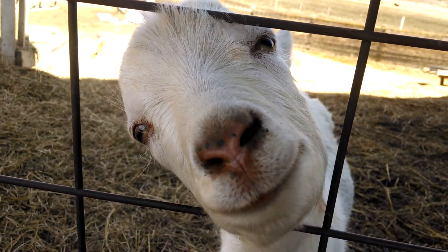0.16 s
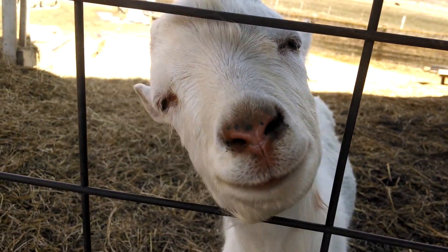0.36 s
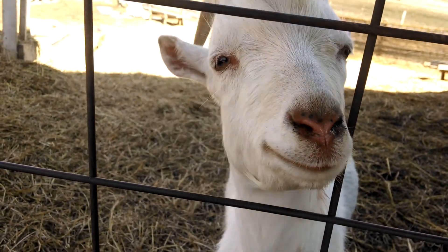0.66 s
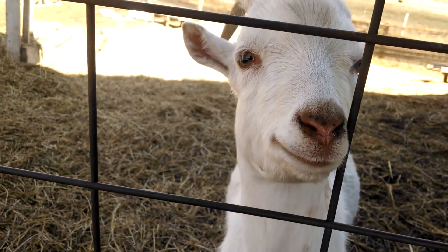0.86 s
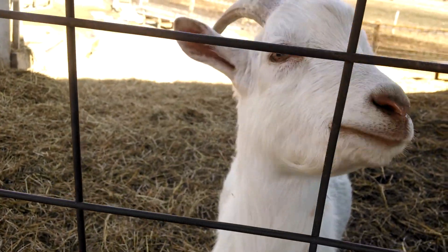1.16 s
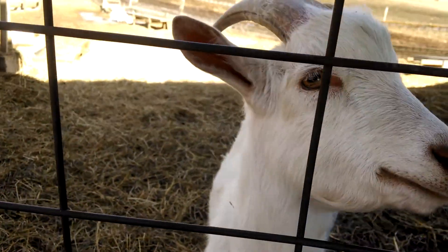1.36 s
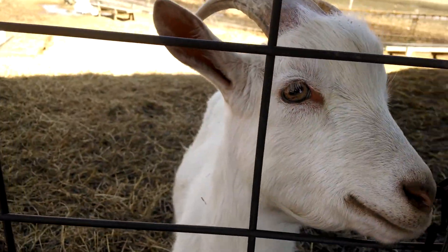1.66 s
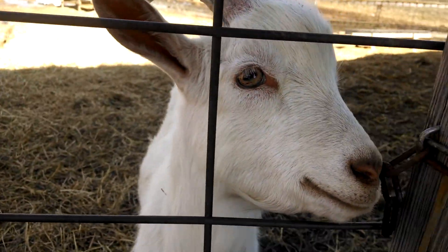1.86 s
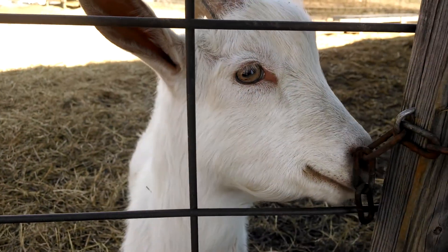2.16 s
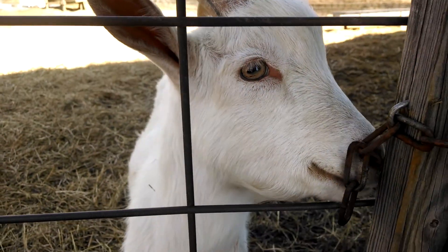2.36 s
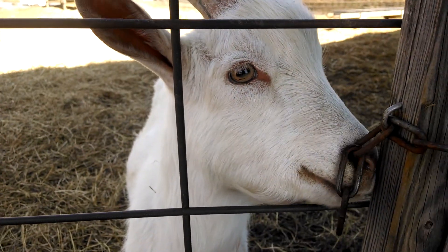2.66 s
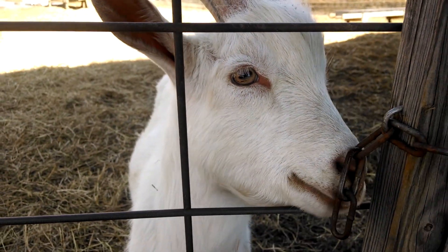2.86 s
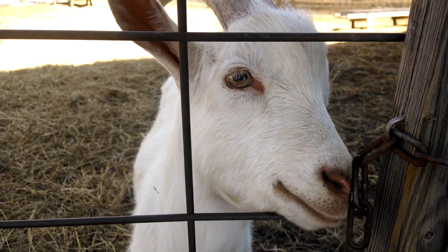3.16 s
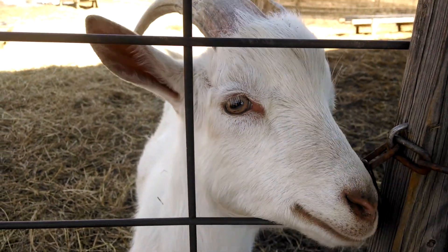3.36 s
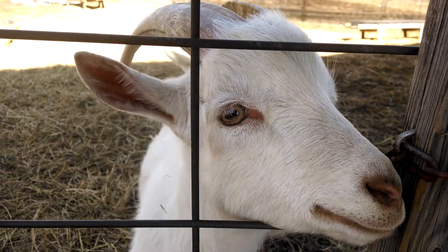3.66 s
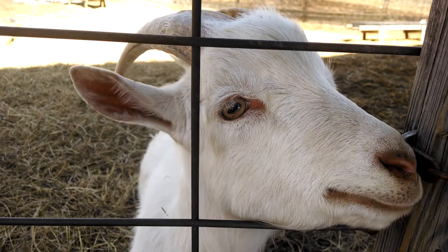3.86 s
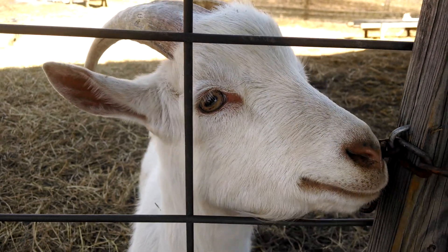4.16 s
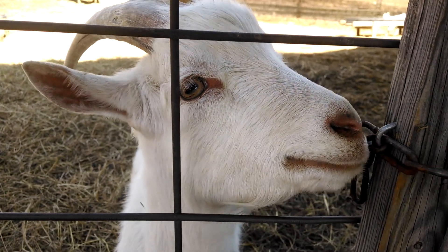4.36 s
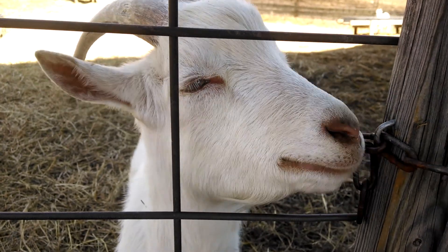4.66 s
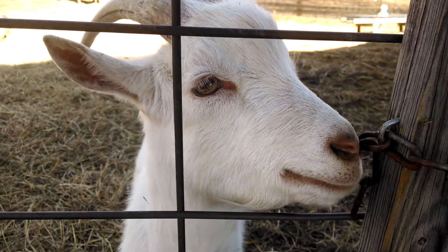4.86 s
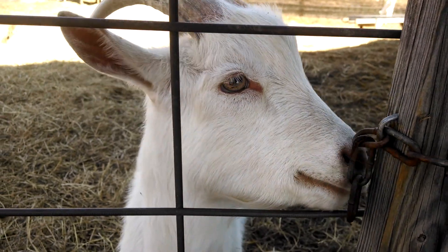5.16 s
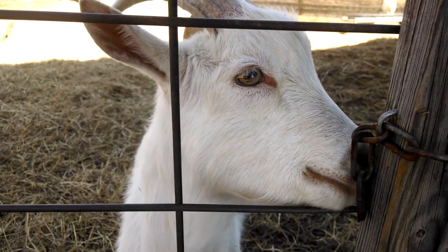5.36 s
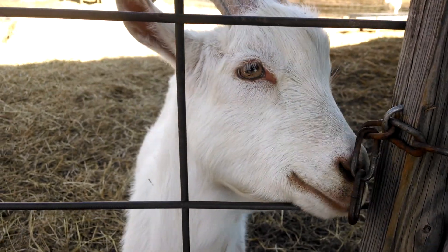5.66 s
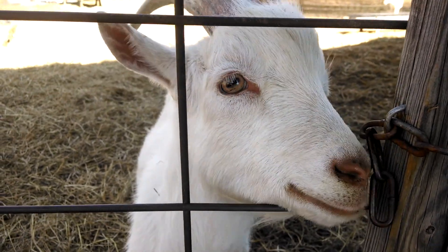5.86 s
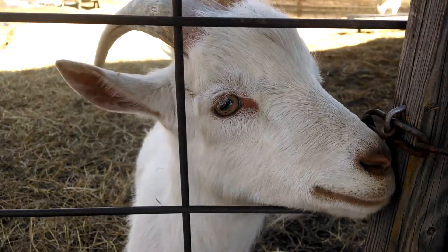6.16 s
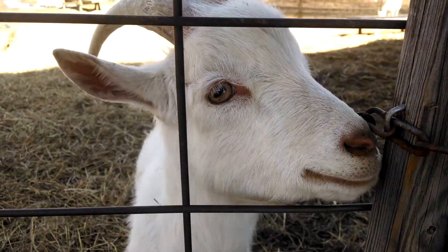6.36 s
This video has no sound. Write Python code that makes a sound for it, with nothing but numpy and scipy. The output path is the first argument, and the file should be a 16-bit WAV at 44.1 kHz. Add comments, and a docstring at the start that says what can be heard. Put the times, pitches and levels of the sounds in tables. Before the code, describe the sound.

Outdoors in a paddock, gusts of wind thump and rumble on a close microphone, hardest on the left. About a second in, a young goat nearby gives one throbbing bleat. It then noses a metal chain on a wooden gate post: the links clink, scrape softly and knock on the wood in uneven clusters, with faint sniffs and a thin nose whistle. The gusts thin out, and the links ring brighter near the end.

```python
"""Wind thumps on a microphone, hardest on the left, as a goat noses a chain on a gate post.
Links clink and scrape, the wooden post knocks, and the goat sniffs with a thin whistle.
About a second in, a young goat nearby gives one throbbing bleat: its vocal folds buzz
and its throat, nose and mouth shape the tone. The microphone has two openings, called ports,
and widens the sound by subtracting a delayed copy of each from the other."""
import sys
import numpy as np
from scipy import signal
from scipy.fft import rfft, irfft
from scipy.io import wavfile
from scipy.ndimage import uniform_filter1d

SR = 44100
rng = np.random.default_rng(int(sys.argv[2]) if len(sys.argv) > 2 else 0)


def master_out(mix):
    """Clip the mix to full scale and print it as 16-bit PCM to the path in sys.argv[1]."""
    frames = np.transpose(np.atleast_2d(mix))
    ceiling = np.clip(frames, -1, 1)
    pcm = np.round(ceiling * 32767).astype(np.int16)
    wavfile.write(sys.argv[1], SR, pcm)


N = 286650

# Tone colours. Each row: frequency in Hz, relative level in dB.
PADDOCK_COLOUR = [(100, -23), (300, 1), (700, -13), (1500, -28.5), (3000, -33), (7000, -27), (16000, -27)]   # far hum and hiss
SCRAPE_COLOUR = [(200, 9.5), (500, 5.5), (1200, 0.5), (2000, -2), (3800, -9.5), (7000, -22), (12000, -79)]   # chain on wood; also used for scattered sound
SNIFF_COLOUR = [(1000, 6), (2500, -10), (5000, -2.5), (8000, -1.5), (12000, -4.5), (16000, -6)]   # air in the nose
CRACK_COLOUR = [(500, -56), (1500, 8), (2600, 8.5), (4000, 4), (6600, 1.5), (9500, -4), (12000, -11),
                (16000, -17)]   # link hitting link
THROAT_COLOUR = [(400, -30), (620, -24.5), (720, -11), (780, -8.5), (850, -1.5), (920, -8.5), (1100, -29.5),
                 (1400, -37), (1800, -21.5), (2250, -20.5), (2500, -22), (2800, 8), (3250, -4), (3450, 3),
                 (3650, -2.5), (3900, -21), (4150, -16), (4600, -11), (6500, -6.5), (8200, -29),
                 (11000, -28)]   # how the throat shapes the voice
BREATH_COLOUR = [(600, -45), (900, -20), (1400, -12), (2200, -22), (3300, 4), (4100, -15.5), (6500, -13),
                 (8200, -14.5), (10500, -33), (12500, -51)]   # air in the throat

# Steady wind. Each row: time in seconds, left level in dB, sheltered right level in dB.
STEADY_WIND = [(0.0, -19, -41), (.26, -26.5, -28), (.45, -18, -52), (.6, -25, -32), (.8, -13, -20),
               (1.05, -50, -22), (1.25, -39, -38), (1.42, -20, -38), (1.75, -19.5, -26), (2.1, -55, -26),
               (2.4, -32.5, -42), (2.9, -28.5, -23.5), (3.2, -20.5, -28.5), (3.42, -37.5, -23),
               (3.9, -37.5, -29), (4.35, -36.5, -29.5), (4.57, -28.5, -26), (4.72, -65, -36.5),
               (5.02, -53.5, -65), (5.4, -39, -65), (5.95, -39, -36.5), (6.5, -36.5, -36.5)]
# Gusts, a left list then a right list. Each row: time in seconds, peak in dB, flutter in dB from peak.
PORT_GUSTS = [
    [(.09, -4, -11.5), (.32, -12, -14.5), (.494, -5.5, -22.5), (.619, -11.5, -18), (.843, -10, -4.5),
     (.925, -10.5, -13.5), (.99, -10, -12.5), (1.107, -8.5, -11.5), (1.152, -16.5, -12.5),
     (1.317, -13, -23), (1.502, -7.5, -15), (1.581, -10, -12), (1.891, -12.5, -13), (1.941, -36, -17),
     (2.015, -15.5, -22), (2.17, -13.5, -15), (2.24, -11, -2), (2.28, -6, -25), (2.365, -20, -7),
     (2.494, -11, -0.5), (2.594, -19.5, -28), (2.674, -14.5, -9.5), (2.724, -19, -30), (2.809, -9.5, -19.5),
     (3.003, -25.5, -8.5), (3.118, -15, -11), (3.582, -20.5, -20), (3.722, -26, -20), (4.001, -22, -33),
     (4.435, -19.5, -40), (5.293, -22.5, -22), (5.547, -36, -32), (6.016, -29, -2), (6.326, -14.5, -19)],
    [(.04, -20.5, -4), (.903, -33, -24), (1.731, -31, -1), (2.479, -8, -10.5), (3.14, -24, -7),
     (4.23, -10.5, -22), (4.615, -23, -4), (6.146, -23.5, -15)],
]
# Wind pops on the left port. Each row: time in seconds, level in dB, frequency in Hz.
WIND_POPS = [(0.087, -18, 150), (0.099, -9.5, 198), (0.317, -10, 171), (.396, -18, 200), (0.486, -17, 198),
             (0.497, -15, 170), (0.627, -21, 170), (.753, -6.5, 152), (0.788, -20.5, 171),
             (0.812, -7.5, 151), (0.834, -7.5, 208), (.884, -24, 200), (0.927, -20, 223.5),
             (.981, -10, 170), (1.103, -23, 133), (1.111, -36, 175), (1.148, -20.5, 202), (2.204, -5, 200),
             (2.228, -10, 303), (2.242, -11, 320), (2.261, -13, 330)]

# Nosing about. Each row: start in seconds, length in seconds, level in dB.
CHAIN_DRAGS = [(0.0, 0.24, -54.5), (0.5, 0.34, -58.5), (1.976, 0.029, -39), (2.628, 0.61, -54.5),
               (3.36, 0.17, -42.5), (3.836, 0.1, -42), (4.183, 0.077, -44.5), (4.439, 0.23, -47),
               (4.767, 0.23, -54), (5.999, 0.25, -50.5), (6.467, .1, -41)]
GOAT_SNIFFS = [(0.0, 0.77, -62), (2.93, 0.3, -51.5), (3.693, 0.19, -51.5), (4.228, 0.18, -47),
               (4.52, 0.13, -54), (5.589, 0.36, -60), (5.978, 0.3, -59.5), (6.443, .1, -48.5)]
# Nostril whistles, one list each. Each row: time in seconds, pitch in Hz, level in dB.
NOSE_WHISTLES = [
    [(2.81, 9100, -54), (2.85, 11300, -64), (3.02, 13500, -66), (3.12, 14500, -51), (3.2, 14200, -53),
     (3.36, 9200, -58)],
    [(3.7, 5200, -77), (3.726, 5791, -52), (3.82, 5318, -53)],
]

# The tones struck things ring with. Each row: frequency in Hz, level in dB, seconds to fade by 60 dB.
POST_TONES = [(810, -14, .05), (1040, -4, .04), (1300, -8, .03), (1680, -2, .05), (1900, -6, .025),
              (2400, -14, .012), (3900, -14, .015)]
GATE_TONES = [(307, 0, .14), (528, -1, .2), (610, -4, .2), (721, -1, .2), (815, -2, .18), (1010, -2, .14),
              (1200, -1, .2), (1500, -4, .16), (1640, -4, .14), (1830, -8, .14), (2060, -9, .12),
              (3300, -15, .06), (4200, -15, .05)]
FENCE_TONES = [(2014, 1.5, 0.068), (3120, 12.5, 0.029), (3550, -2, 0.059), (3860, -10, 0.25),
               (5040, -5, .08), (5700, -8, 0.12), (7500, -20, 0.082)]
WIRE_TONES = [(4400, 3.5, 0.026), (4480, -25, 0.017)]
NEAR_LINK_TONES = [(11320, -6, .1), (11420, -2, .15), (11560, -16, .05), (10760, -20, .05),
                   (3400, -24, .12), (6750, -16, .04)]
FAR_LINK_TONES = [(12120, -15, .16), (12160, -15, .3), (12540, -14, .05), (12800, -14, .05),
                  (13190, -14, .2)]
# Chain hits. Each row: time in seconds, crack in dB, crack centre in Hz, knock in dB, link ring in dB.
CHAIN_HITS = [(0.148, -30, 3630, -35, -61), (1.9748, -24, 7000, -34, -43), (2.363, -66, 4180, -63, -91),
              (2.4057, -44, 1625, -43, -87), (2.7204, -50, 1530, -49, -74), (2.901, -64, 1520, -41, -71),
              (3.3433, -40, 1800, -61, -63), (3.368, -42.5, 4100, -38, -73), (3.3771, -44, 1630, -35, -60),
              (3.4416, -27, 2580, -43, -54), (3.469, -23, 4150, -39, -35), (3.487, -25, 4070, -38.5, -58),
              (3.684, -42.5, 4030, -35.5, -69), (3.7924, -35.5, 1650, -38, -56),
              (3.8105, -30.5, 1720, -30.5, -71), (3.8432, -26, 1530, -40, -52),
              (3.884, -24.5, 4230, -31, -54), (3.9426, -19, 4170, -90, -62),
              (4.0522, -34, 1860, -33.5, -77), (4.1349, -38, 1650, -40.5, -73),
              (4.2069, -23.5, 4070, -29, -61), (4.5275, -30, 1800, -39, -59),
              (4.601, -33.5, 3350, -37.5, -70), (4.622, -30, 3400, -39, -68),
              (4.6306, -15, 8500, -63, -30.5), (4.781, -32, 1580, -31.5, -58), (4.789, -58, 1630, -39, -72),
              (4.8144, -13, 3870, -38, -41), (4.9301, -45, 1610, -41, -98), (4.9578, -41.5, 1800, -51, -64),
              (5.0659, -52, 1610, -45.5, -73), (5.1903, -46.5, 1640, -53, -76),
              (5.214, -44, 1650, -51, -59), (5.2643, -32, 1830, -51, -69), (5.9803, -27.5, 1650, -76, -53),
              (6, -30.5, 1660, -49, -64), (6.0286, -27.5, 4020, -32.5, -46),
              (6.0378, -30.5, 1630, -33.5, -36), (6.1677, -18.5, 5400, -40.5, -16),
              (6.2002, -39, 3850, -56, -37), (6.335, -23, 2150, -24.5, -63), (6.36, -64, 1710, -68, -39),
              (6.4051, -25, 4270, -89, -21), (6.455, -29, 1680, -34.5, -32)]
# Small ticks on a wire. Each row: time in seconds, level in dB.
WIRE_TICKS = [(1.6488, -26), (1.8034, -26.5), (1.8734, -32)]
# Jingles as the goat leans on the chain. Each row: time in seconds, near link in dB, far link in dB.
LINK_JINGLES = [(1.62, -60, -68), (1.66, -60, -62), (1.72, -58, -58), (1.77, -62, -66), (1.98, -66, -43),
                (2.06, -70, -50), (2.13, -70, -53)]

# The bleat's throbs. Each row: start in seconds, length in seconds, top pitch in Hz,
# closing fall as a share of that pitch, level in dB, brightness in dB.
BLEAT_THROBS = [(1.194, 0.062, 452, 0.21, -67.5, 4.5), (1.31, 0.05, 442.8, .3, -40, 5.5),
                (1.403, 0.061, 447.6, 0.11, -25, -4), (1.505, 0.062, 450.2, 0.14, -23, -4.5),
                (1.606, 0.067, 462.5, .2, -25, -4), (1.706, 0.067, 465.4, .2, -22, -5),
                (1.81, 0.063, 463.4, .2, -23.5, -4.5), (1.912, .07, 459.8, .2, -23, -6),
                (2.012, 0.072, 464.7, 0.22, -22, -6.5), (2.113, 0.071, 459, 0.2, -22, -6.5),
                (2.208, 0.067, 361, -.03, -27, -17)]
# The shape of one throb. Each row: share of its length, share of the opening rise still to come,
# share of the closing fall, added level in dB, added brightness in dB.
THROB_SHAPE = [(-.08, 1.0, 0.011, -41, 10), (.03, .85, 0.0049, -8, -3), (.17, .47, 0.015, -8.5, 1.5),
               (.31, .22, 0.02, -2.5, -1), (.47, 0.012, 0.012, 0, -4.5), (0.649, 0.0018, 0, 1, -2.5),
               (.8, 0, .33, -5.5, 1.5), (.93, 0.041, .55, -15.5, 8), (1.099, 0.11, 0.93, -52, 5),
               (1.299, 0.0059, 0.96, -43, -1)]
# Nose and mouth ring at fixed pitches. Each row: frequency in Hz, seconds to fade by 60 dB, level in dB.
HEAD_CAVITIES = [(850, .09, -9), (1650, .03, -2), (3220, .04, -3), (3660, .05, 0)]


def from_db(db):
    """Turn decibels into a number to multiply by."""
    return 10 ** (np.asarray(db) / 20)


def rms_one(x):
    """Scale a signal so its average strength (rms) is 1."""
    return x / np.sqrt(np.mean(x ** 2) + 1e-20)


def in_time(rows):
    """Join timed rows with straight lines, giving one curve for each column after the time."""
    times, *columns = np.transpose(rows)
    return [np.interp(np.arange(N) / SR, times, column) for column in columns]


def at_hz(colour, hz):
    """Look up a tone colour's level in dB at a frequency."""
    frequencies, levels = np.transpose(colour)
    return np.interp(np.log(hz), np.log(frequencies), levels)


def noise(colour, channels=1):
    """Noise with the given tone colour and strength 1."""
    gain = from_db(at_hz(colour, np.maximum(np.arange(N // 2 + 1) * SR / N, 1)))
    return rms_one(irfft(rfft(rng.standard_normal((channels, N))) * gain, N))


def drift(rate_hz):
    """A smooth random wobble of strength 1."""
    smooth = signal.butter(2, rate_hz, fs=SR, output="sos")
    return rms_one(signal.sosfilt(smooth, rng.standard_normal(N + SR))[SR:])


def swells(start_s, length_s, peak_db, rise_db_s, fall_db_s, rest_db):
    """A level in dB that rises, holds and falls for each event, never below a resting level."""
    t = np.arange(0, N, 64) / SR
    since = t - np.reshape(start_s, (-1, 1))
    past_end = np.maximum(since - np.reshape(length_s, (-1, 1)), 0)
    db = np.reshape(peak_db, (-1, 1)) + rise_db_s * np.minimum(since, 0) - fall_db_s * past_end
    return np.maximum(np.interp(np.arange(N) / SR, t, db.max(axis=0)), rest_db)


def strike(out, start_s, tones, level_db, sustain=1, detune=0.001359, spread_db=2.0, rise_s=1e-4):
    """Add one blow to out. Each tone's level and tuning vary by chance; sustain stretches the fade."""
    part = out[int(start_s * SR):][:int(SR * sustain * max(tone[2] for tone in tones))]
    t = np.arange(len(part)) / SR
    onset = 1 - np.exp(-t / rise_s)
    for (hz, tone_db, fade_s), (louder, shift) in zip(tones, rng.normal(0, 1, (len(tones), 2))):
        gain = from_db(level_db + tone_db + spread_db * louder - 60 * t / (fade_s * sustain))
        part += gain * onset * np.sin(2 * np.pi * hz * (1 + detune * shift) * t)


def at_ports(x, lag_samples, right_db, shade_hz):
    """Sound from the right reaches the left port late, dulled by the microphone's body."""
    late = np.interp(np.arange(N) - lag_samples, np.arange(N), x)
    shaded = signal.lfilter(*signal.butter(1, shade_hz, fs=SR), late)
    return np.array([shaded, x * from_db(right_db)])


def paddock():
    """A faint, far hum and hiss that slowly wavers."""
    return from_db(-56.5 + drift(1.0)) * noise(PADDOCK_COLOUR, channels=2) * from_db([[0], [1.5]])


def eddies(low_hz, high_hz, even_s):
    """Swirling air: a band of noise with its own swells evened out."""
    x = rng.standard_normal(N + SR)
    x = signal.sosfilt(signal.butter(2, low_hz, "high", fs=SR, output="sos"), x)
    x = signal.sosfilt(signal.butter(4, high_hz, fs=SR, output="sos"), x)[SR:]
    size = int(even_s * SR)
    power = uniform_filter1d(uniform_filter1d(x ** 2, size), size)
    return rms_one(x / np.sqrt(power))


def gusts(rows, steady_db, rumble_band, flutter_band):
    """Gusts hit one port with a low rumble and a higher flutter that comes and goes faster."""
    times, peak_db, extra_db = np.transpose(rows)
    slopes_db_s = np.array([540, 502])   # rise, fall
    rumble_db = swells(times, 0, peak_db, *slopes_db_s, steady_db)
    flutter_db = swells(times, 0, peak_db + extra_db, *(1.54 * slopes_db_s), steady_db - 15.5)
    return from_db(rumble_db) * eddies(*rumble_band) + from_db(flutter_db) * eddies(*flutter_band)


def wind():
    """Each port has its own eddies; the left also pops with a sudden suction and a rebound."""
    left_db, right_db = in_time(STEADY_WIND)
    waver = from_db(4.7 * drift(25.7))
    left = waver * gusts(PORT_GUSTS[0], left_db, (9.1, 128.5, .025), (210, 259, .2))
    right = gusts(PORT_GUSTS[1], right_db, (32.4, 79.4, .18), (191, 280, .023))
    for s, level_db, hz in WIND_POPS:
        cycles = hz * np.arange(1500) / SR
        shape = np.exp(-cycles) * (1 - np.exp(-cycles / .079))
        left[int(s * SR):][:1500] -= from_db(level_db) * np.sin(2 * np.pi * cycles) * shape
    return np.array([left, right])


def nose_whistle():
    """Air through a nostril makes a thin, unsteady tone."""
    hz, level_db = in_time(np.concatenate(NOSE_WHISTLES))
    t, blowing = np.arange(N) / SR, 0
    for rows in NOSE_WHISTLES:
        start, end = rows[0][0], rows[-1][0]
        blowing += np.interp(t, [start - .01, start, end, end + .01], [0, 1, 1, 0])
    gain = blowing * from_db(level_db + 7.8 * drift(40.0) - 4)
    pitch = hz * (1 + .008 * drift(200.0))
    return gain * np.sin(2 * np.pi * np.cumsum(pitch) / SR)


def grit(catches_per_s=400, spread_db=6):
    """Dragged links catch again and again, keeping the gate and post ringing."""
    catches = rng.random(N) < catches_per_s / SR
    catches = catches * from_db(spread_db * np.minimum(rng.exponential(1, N), 3))
    catches *= rng.choice([-1, 1], N)
    tones = GATE_TONES + POST_TONES
    which_tone, out = rng.integers(0, len(tones), N), 0
    for k, (hz, tone_db, fade_s) in enumerate(tones):
        decay = from_db(-60 / (.6 * fade_s * SR))   # the chain cuts the ringing short
        feedback = [1, -2 * decay * np.cos(2 * np.pi * hz / SR), decay ** 2]
        ring = signal.lfilter([0, 1], feedback, catches * (which_tone == k) + 1e-18)
        out += from_db(tone_db) * rms_one(ring)
    return rms_one(out)


def nosing(rest_db=-62, grit_db=5):
    """The goat drags the chain over wood with a grainy scrape, and sniffs with a smooth hiss."""
    scrape_db = swells(*np.transpose(CHAIN_DRAGS), rise_db_s=198, fall_db_s=144, rest_db=rest_db)
    sniff_db = swells(*np.transpose(GOAT_SNIFFS), rise_db_s=120, fall_db_s=58, rest_db=-78)
    scrape = from_db(scrape_db + 2.8 * drift(23.0) + .25 * drift(240.0))
    scrape = scrape * noise(SCRAPE_COLOUR, channels=2)
    sniff = from_db(sniff_db) * noise(SNIFF_COLOUR, channels=2)
    whistle = nose_whistle()
    catching = (from_db(scrape_db) - from_db(rest_db)) * from_db(grit_db) * grit()
    direct = at_ports(scrape[0] + catching + .95 * sniff[0] + whistle, 9.93, .49, 2800)
    return direct + scrape[::-1] * [[1.32], [0]] + sniff[::-1] * [[1], [.4]]


def crack(hiss, hz, crack_db, knock_db, snap_s=.0014, tail_s=.009):
    """Links snap together; hits that reach the post rub, so they start softer and last longer."""
    t = np.arange(len(hiss)) / SR
    rub = np.clip(.62 + .022 * (knock_db - crack_db), .08, .9)
    band = signal.lfilter(*signal.butter(1, [hz / 2, min(hz * 2.2, 18000)], "band", fs=SR), hiss)
    rise = 1 - np.exp(-t / (.0001 + .006 * rub ** 2))
    fall = (1 - rub) * np.exp(-t / snap_s) + rub * np.exp(-t / tail_s)
    return rms_one(band) * from_db(crack_db + 6) * rise * fall


def knock_post(out, s, knock_db, bounces=3):
    """Links knock the post, bounce as they settle, and set the gate ringing."""
    strike(out, s, POST_TONES, knock_db - 2, detune=.05, spread_db=4)
    for late in rng.random(bounces):
        strike(out, s + .003 + .028 * late, POST_TONES, knock_db - 5 * (1 + late), detune=.15, spread_db=5)
    strike(out, s, GATE_TONES, knock_db - 11, sustain=.6, detune=.006)


def scatter(decay_s=.02):
    """Each crack bounces off fence and ground as a short puff of noise."""
    clicks = np.full(N, 1e-18)
    for s, crack_db, _, knock_db, _ in CHAIN_HITS:
        clicks[int(s * SR)] = from_db(crack_db - 9 + .2 * (knock_db - crack_db))
    level = signal.lfilter([1], [1, -np.exp(-1 / (decay_s * SR))], clicks)
    return level * noise(SCRAPE_COLOUR, channels=2)


def chain(held_from_s=6.1):
    """Each hit cracks, knocks the post and rings two links; in between, wire ticks and links jingle."""
    knocks, links = np.zeros(N), np.zeros(N)
    hiss = noise(CRACK_COLOUR)[0]
    for s, crack_db, hz, knock_db, ring_db in CHAIN_HITS:
        span = slice(int(s * SR), int(s * SR) + 1500)
        knocks[span] += crack(hiss[span], hz, crack_db, knock_db)
        knock_post(knocks, s, knock_db)
        if hz > 3000:   # bright cracks also tick on the wire
            strike(knocks, s, WIRE_TONES, crack_db - 19, detune=.02)
        sustain = 1 if s < held_from_s else .18   # shorter once the nose holds the links
        strike(links, s, NEAR_LINK_TONES, ring_db, sustain, rise_s=.004)
        strike(links, s, FAR_LINK_TONES, ring_db - 7.5, sustain, rise_s=.004)
    strike(links, .16, FENCE_TONES, -54.5)   # the first hit shakes the wire fence panel
    for s, level_db in WIRE_TICKS:
        strike(knocks, s, WIRE_TONES, level_db)
    for s, near_db, far_db in LINK_JINGLES:   # links hanging free ring longer
        strike(links, s, NEAR_LINK_TONES, near_db, sustain=1.6)
        strike(links, s, FAR_LINK_TONES, far_db, sustain=1.6)
    return at_ports(knocks, 6.3, .91, 1660) + at_ports(links, 8.8, 16.5, 1800) + scatter()


def bleat_echoes(voice, linger_s=.05, fade_s=.22):
    """The bleat comes back from all around as scattered echoes and a lingering wash of noise."""
    decay = np.exp(-1 / (linger_s * SR))
    level = np.sqrt(signal.lfilter([1 - decay], [1, -decay], voice ** 2 + 1e-18))
    tail = rng.standard_normal((2, SR // 2)) * from_db(-60 * np.arange(SR // 2) / SR / fade_s)
    echoes = signal.fftconvolve(voice[None], tail / np.linalg.norm(tail[0]), axes=1)[:, :N]
    low_wash = from_db(-13) * noise(SCRAPE_COLOUR, channels=2)
    airy_wash = from_db(-20) * noise(BREATH_COLOUR, channels=2)
    return level * (low_wash + airy_wash) + from_db(-8) * echoes


def throbs():
    """Each throb arches in pitch and level, with the vocal folds slack at both ends."""
    rows = []
    for s, length, top_hz, fall, level_db, bright_db in BLEAT_THROBS:
        sag = .33 - .044 * (s - BLEAT_THROBS[0][0])   # later throbs start nearer their top pitch
        for share, opening, closing, more_db, brighter_db in THROB_SHAPE:
            hz = top_hz * (1 - sag * opening - fall * closing)
            slack = .5 * opening + 2 * closing
            rows.append((s + share * length, hz, level_db + more_db, bright_db + brighter_db, slack))
    return sorted(rows)


def bleat(rasp_db=3, breath_db=-16):
    """Vocal folds make a stack of tones and puffs of air; the nose and mouth ring along."""
    rows = throbs()
    pitch, level_db, bright_db, slack = in_time(rows)
    pitch = uniform_filter1d(pitch, size=300) * (1 + .0015 * drift(100.0))
    phase = 2 * np.pi * np.cumsum(pitch) / SR
    call = slice(int(rows[0][0] * SR), int(rows[-1][0] * SR))
    low, high, waver = np.zeros(N), np.zeros(N), drift(45.0)
    for k in range(1, 25):   # tones at whole multiples of the pitch
        waver_db = rasp_db * np.roll(waver, k * 9000)[call] * (k > 2)
        height = np.sqrt(2) * from_db(at_hz(THROAT_COLOUR, k * pitch[call]) + waver_db)
        band = low if k < 6 else high
        band[call] += height * np.sin(k * phase[call] + rng.uniform(0, 5.0))
    puffs = noise(BREATH_COLOUR)[0] * (1 + .85 * np.cos(phase))
    slack = np.clip(slack[call], 0, 1)   # slack folds give more air than tone
    breath = (from_db(breath_db) + .4 * slack) * puffs[call]
    high[call] = (1 - .7 * slack) ** 2 * rms_one(high[call]) + breath
    low[call] += from_db(-31.5) * eddies(830, 1254, .017)[call]   # air in the throat's lowest ring
    voice = from_db(level_db) * (low + from_db(bright_db) * high)
    for hz, fade_s, gain_db in HEAD_CAVITIES:
        decay = from_db(-60 / (fade_s * SR))
        feedback = [1, -2 * decay * np.cos(2 * np.pi * hz / SR), decay ** 2]
        voice += from_db(gain_db) * signal.lfilter([1 - decay, 0, decay - 1], feedback, voice + 1e-18)
    return voice + from_db(-20) * np.roll(voice, int(.015 * SR))   # a short echo off a shed wall


def scene():
    """Add up everything that reaches the left and right ports."""
    background = paddock()
    voice = bleat()
    direct_voice = at_ports(voice, lag_samples=9.17, right_db=5.6, shade_hz=3900)
    return background + wind() + nosing() + direct_voice + bleat_echoes(voice) + chain()


def record(dry, dull_hz=5000, lag_samples=15, cutoff_hz=16800):
    """Subtract a late, dulled copy of each port from the other, round the peaks and cut the top."""
    decay = np.exp(-2 * np.pi * dull_hz / SR)
    other_port = signal.lfilter([1 - decay], [1, -decay], dry[::-1])
    wide = dry - .68 * np.roll(other_port, lag_samples, axis=1)
    rounded = wide / (1 + (wide / .92) ** 4) ** .25
    return signal.sosfilt(signal.cheby2(12, 70, cutoff_hz, fs=SR, output="sos"), rounded)


dry = scene()
out = record(dry)
master_out(out)
```